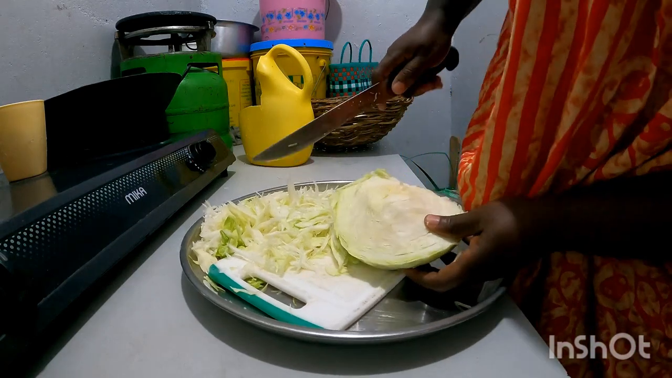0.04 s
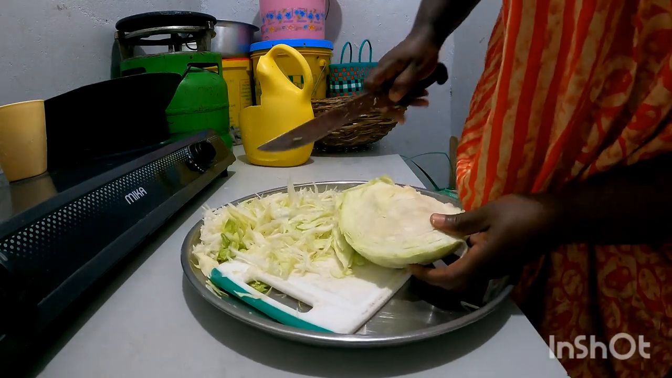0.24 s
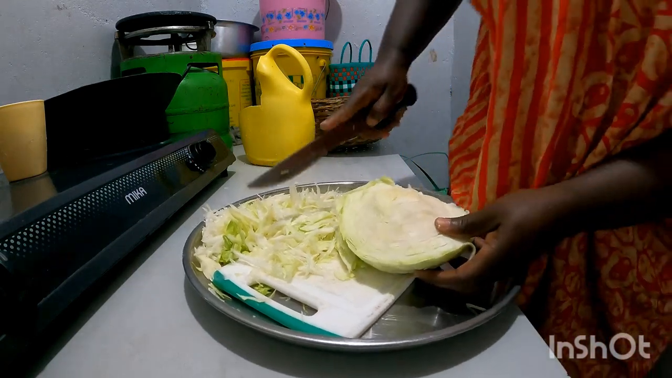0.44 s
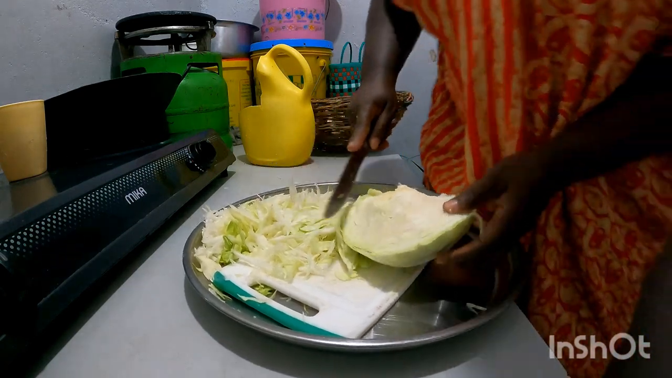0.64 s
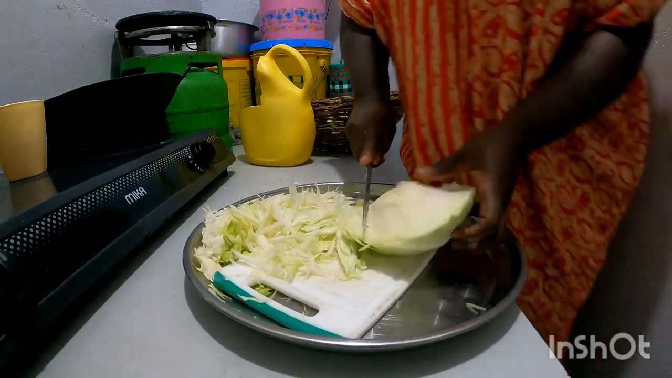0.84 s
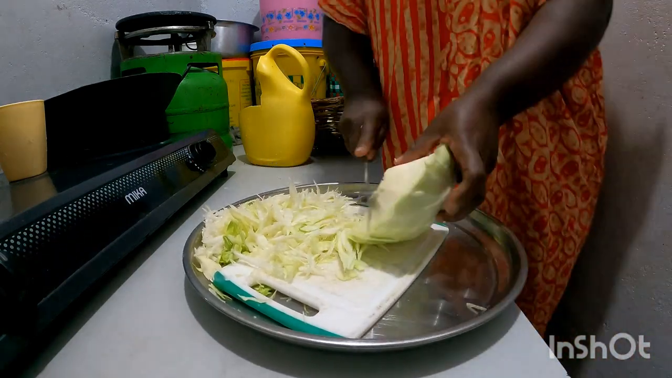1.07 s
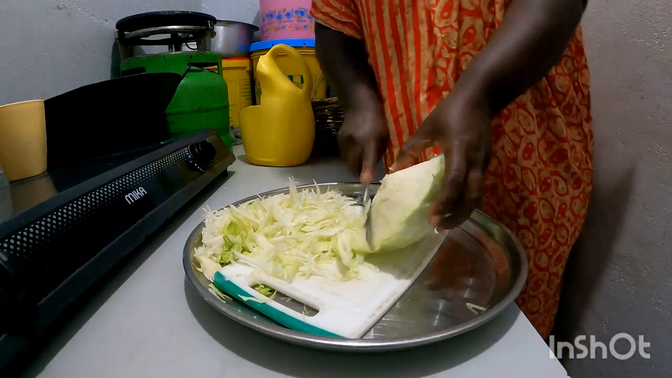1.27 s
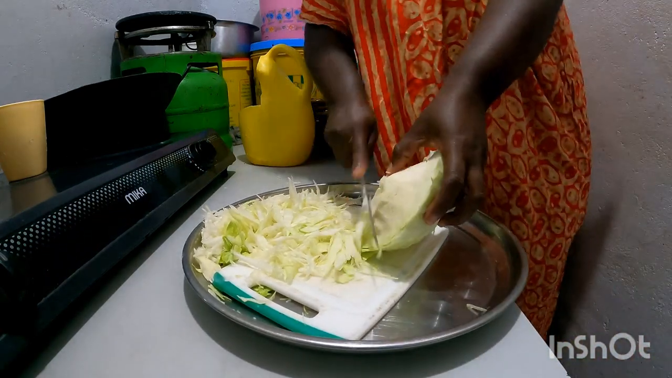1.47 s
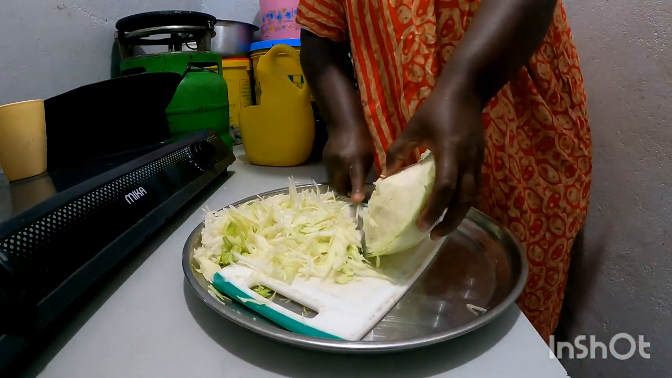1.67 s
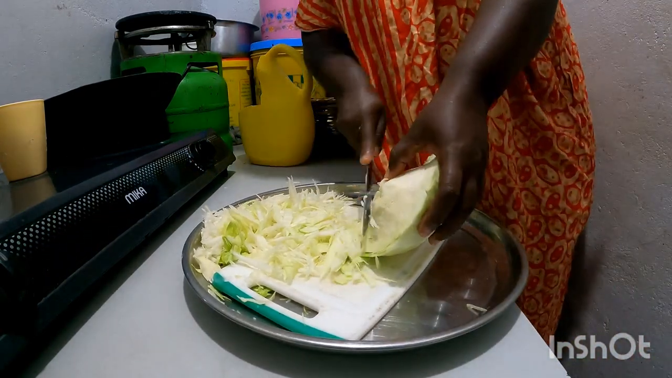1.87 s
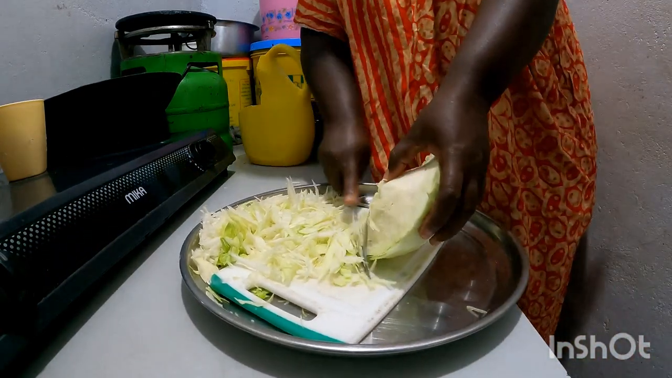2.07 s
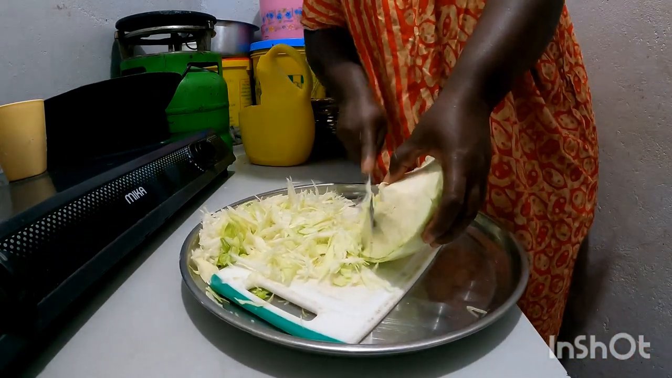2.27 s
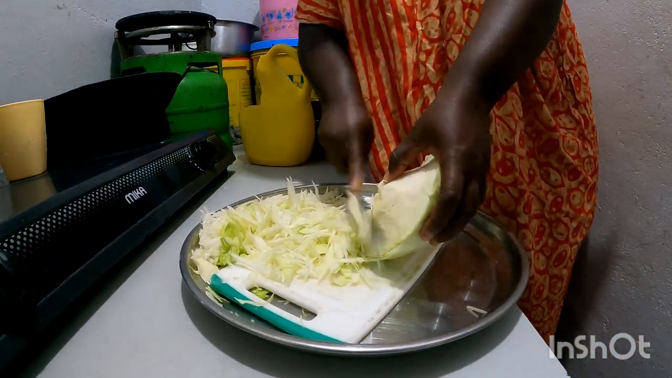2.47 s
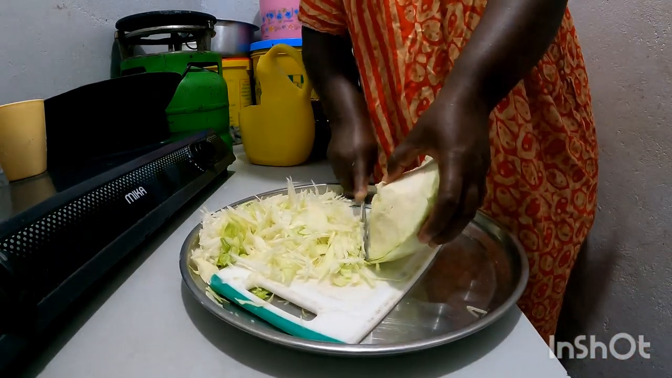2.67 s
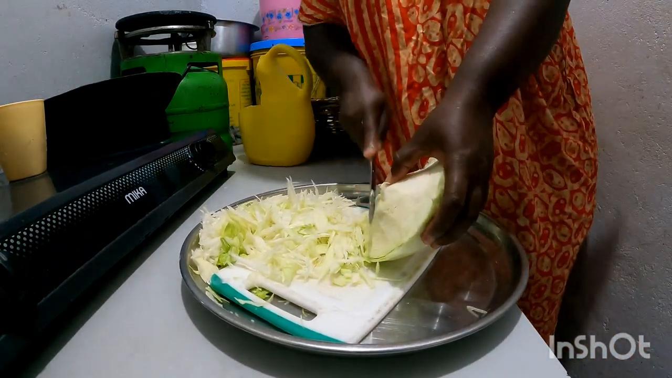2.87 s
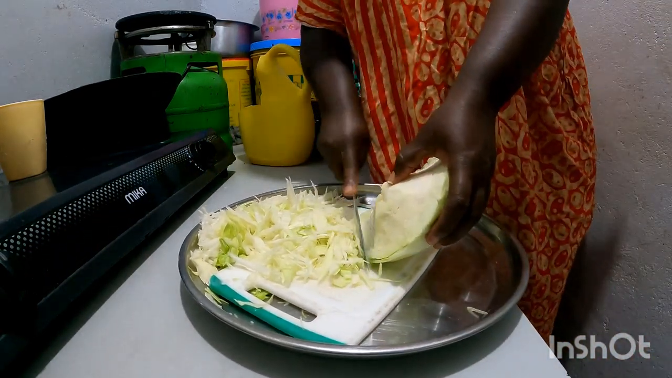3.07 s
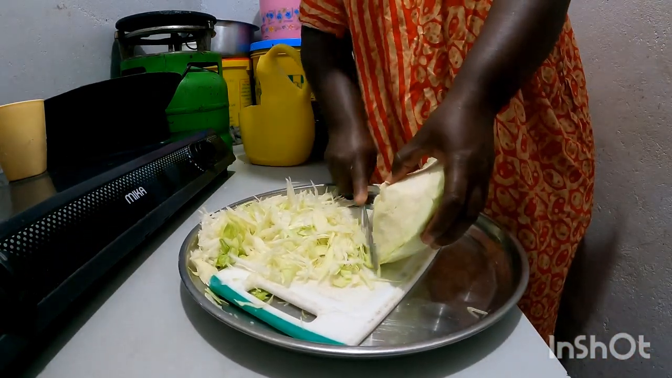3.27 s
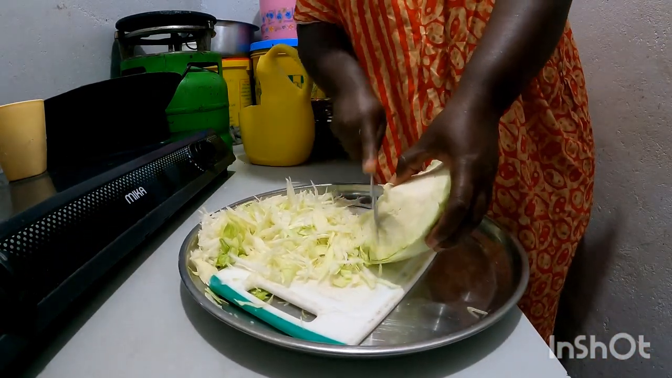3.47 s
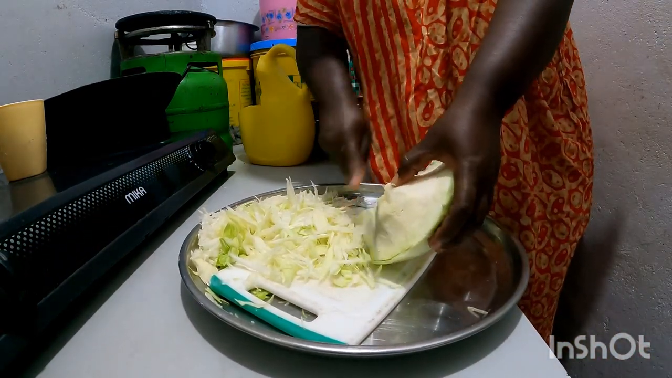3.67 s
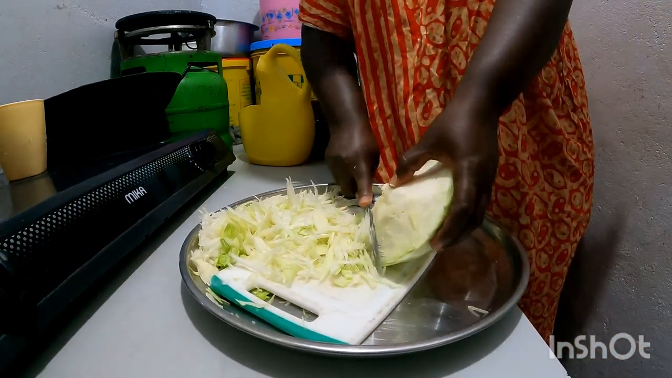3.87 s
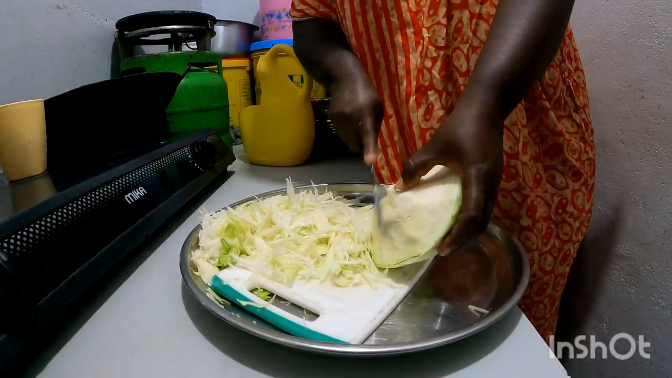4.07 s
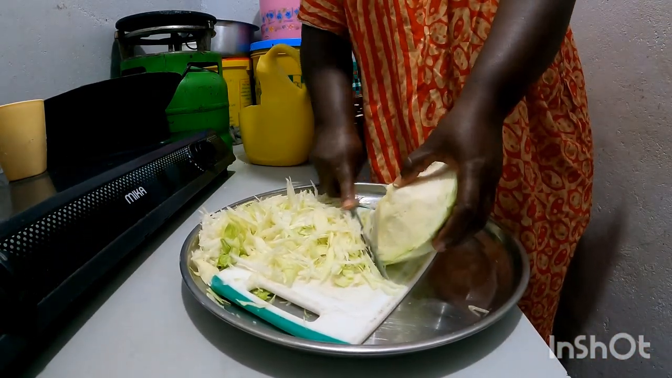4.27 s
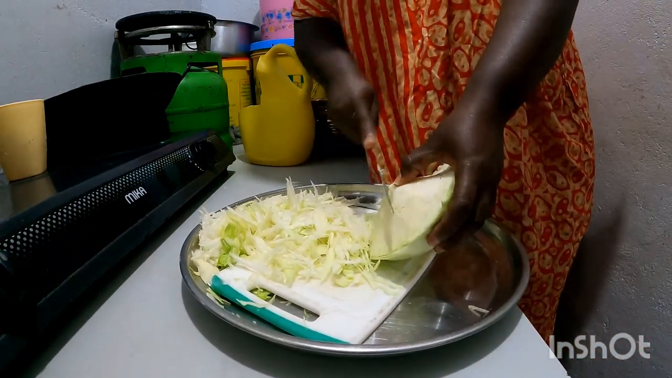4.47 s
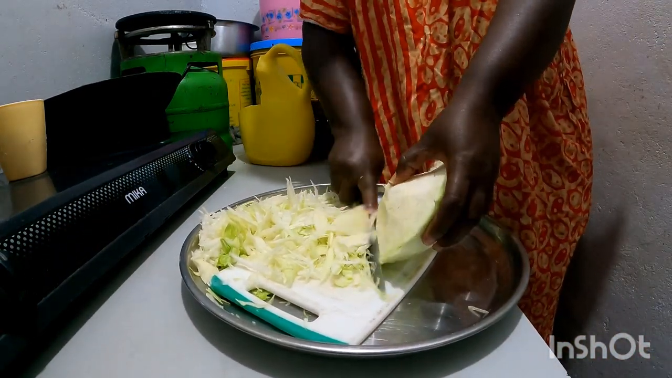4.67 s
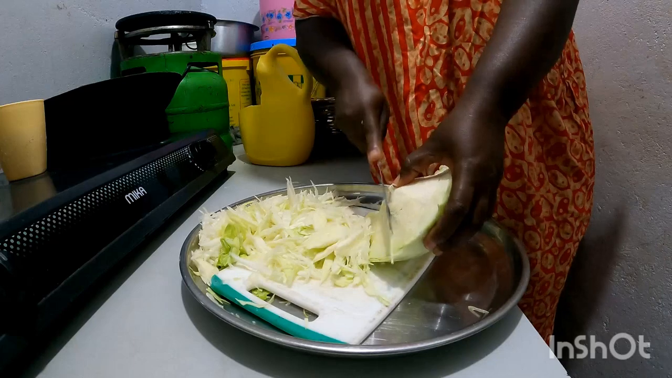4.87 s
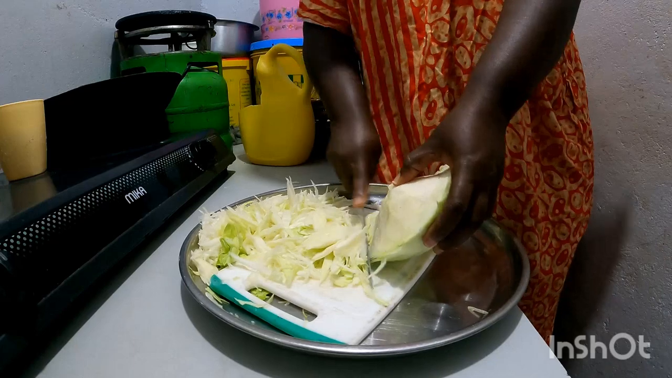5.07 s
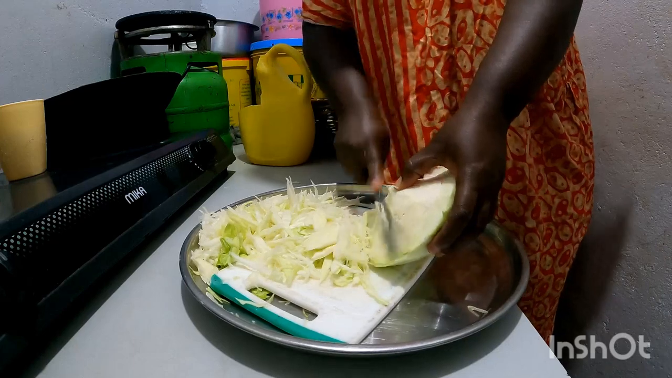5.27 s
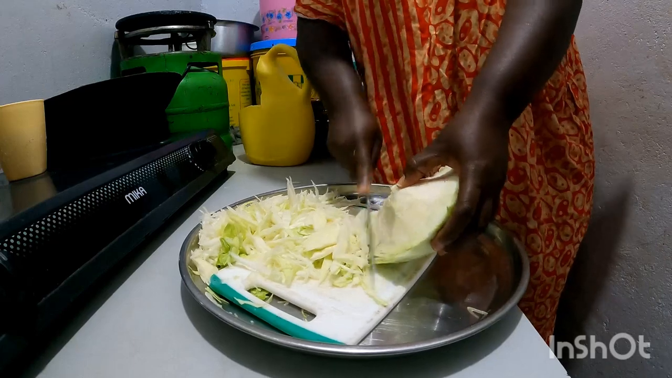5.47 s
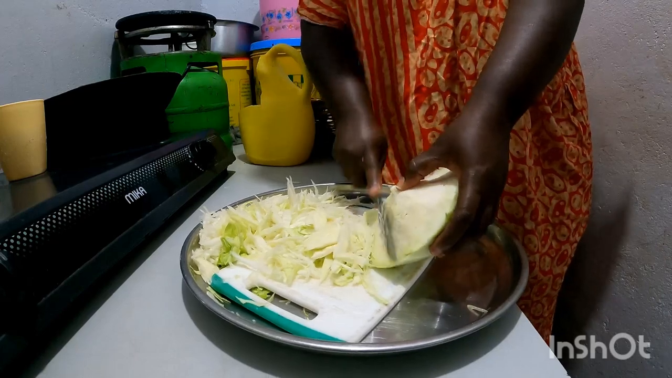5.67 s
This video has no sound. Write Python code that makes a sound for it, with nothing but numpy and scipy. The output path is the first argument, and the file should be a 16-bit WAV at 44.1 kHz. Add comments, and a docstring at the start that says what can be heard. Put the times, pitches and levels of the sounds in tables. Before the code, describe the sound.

A kitchen knife shreds cabbage close to the microphone. After a soft rub of leaves and a light scrape of the blade, about a dozen crunchy cuts follow in an even rhythm. The blade clacks on a plastic board, drawing a short ring from a steel tray. Loose shreds rustle and the counter gives an occasional dull bump, while a faint rumble lies under the small kitchen's echo.

```python
"""A kitchen knife shreds half a cabbage: each stroke tears through the leaves as a swelling crunch.
Most strokes end with the blade knocking a plastic board, which rings the steel tray it lies in.
Before the first cut the blade slides over the cabbage. Now and then a hand brushes the leaves,
shreds drop or the counter is bumped. The small, hard-walled kitchen echoes; a low rumble lies beneath."""
import sys
import numpy as np
from scipy import signal
from scipy.fft import rfft, irfft
from scipy.io import wavfile
from scipy.ndimage import uniform_filter1d

SR = 44100
rng = np.random.default_rng(int(sys.argv[2]) if len(sys.argv) > 2 else 0)


def put_to_file(sound):
    """Save the sound as 16-bit audio at rate SR, in the file named by the first command-line argument."""
    columns = np.atleast_2d(sound).T  # one column per channel
    safe = np.clip(columns, -1, 1)
    whole_steps = np.round(safe * 32767)
    wavfile.write(sys.argv[1], SR, whole_steps.astype(np.int16))


N = 253113


# The tone of a crisp leaf breaking: (frequency [Hz], level [dB])
LEAF_TONE = [(300,-14.5),(900,2),(2000,-19),(2800,3.5),(4800,2),(6500,-1.5),(8500,-7.5),(10500,-5),(13000,-18),(15000,-26),(16000,-33)]
# The tone of a knock on the plastic board: (frequency [Hz], level [dB])
KNOCK_TONE = [(100,-8.5),(250,-5),(350,-12.5),(520,-14.5),(800,-5.5),(1150,6),(1700,0),(2200,-1.5),(3000,-7),(6000,-59.5)]
def cutting(ribs_db=-5):
    """Bursting cells fizz and leaf ribs snap; gives the crunch and the force on the board."""
    cells = tiny_breaks(per_s=3500, spread_db=2.5, clump_db=1.5)
    ribs = tiny_breaks(per_s=360, spread_db=0.5, clump_db=4)
    breaks = unit(cells + amp(ribs_db) * ribs)
    crunch_gain, force_gain = strokes()
    crackle = grains(breaks * crunch_gain, LEAF_TONE, t60=0.0061)
    force = breaks * force_gain
    through_board = grains(force, KNOCK_TONE, t60=0.013)
    return amp(-0.5) * crackle + amp(-2) * through_board, force


# Knife strokes: (blade bites [s], deepest point [s], comes through [s], crunch level [dB],
# force level [dB], crunch swell from bite to deepest [dB], crunch fade time [s])
STROKES = [ (1.366, 1.44, 1.482, -21, -17.5, 19.5, 0.02), (1.695, 1.762, 1.777, -24, -18.5, 24.5, 0.036),
           (2.035, 2.108, 2.117, -22, -15, 19, .003), (2.377, 2.451, 2.503, -26.5, -21.5, 17, 0.0025),
           (2.708, 2.770, 2.765, -26, -21.5, 19, 0.034), (3.019, 3.069, 3.078, -21, -15, 26, 0.0052),
           (3.325, 3.395, 3.444, -27.5, -21.5, 10, 0.0035), (3.600, 3.647, 3.68, -29, -25.5, 17.5, 0.0019),
           (3.887, 3.961, 3.95, -27.5, -25, 18.5, 0.047), (4.212, 4.297, 4.306, -26, -19.5, 20, 0.004),
           (4.651, 4.756, 4.804, -27, -27.5, 23, 0.0065), (5.038, 5.102, 5.22, -34.5, -28.5, 17, 0.0032),
           (5.350, 5.426, 5.64, -37.5, -36.5, 13, 0.0043), ]
def strokes(force_lag_s=0.0054):
    """The deeper the blade, the more leaves tear at once; gives the gains of crunch and force."""
    crunch, force = np.zeros(N), np.zeros(N)
    for bite, deepest, end, crunch_db, force_db, swell_db, fade in STROKES:
        skin_db = 0.5 * hump(bite + 0.027, 0.0042)  # the taut outer leaf gives way first
        pinch_db = 3.5 * hump(end - 0.0047, 0.0067)  # the last leaves, pinched, burst together
        tear = swell(bite, deepest, end, swell_db, sag_db_per_s=53, fade_s=fade)
        press = swell(bite + force_lag_s, deepest, end, 1.11 * swell_db, sag_db_per_s=79, fade_s=fade / 2)
        crunch += amp(crunch_db + skin_db + pinch_db) * tear
        force += amp(force_db + skin_db) * press
    return crunch, force


def swell(start, top, end, swell_db, sag_db_per_s, fade_s, bite_s=0.016):
    """Gain of one pass of the blade: it bites, swells to the top, eases off and fades."""
    t = np.arange(N) / SR
    rise_db = -swell_db * np.clip((top - t) / max(top - start, 0.001), 0, 1)
    sag_db = sag_db_per_s * np.clip(t - top, 0, abs(end - top))
    bite = np.clip((t - start) / bite_s, 0, 1) ** 2
    return amp(rise_db - sag_db) * bite * np.exp(-np.maximum(t - end, 0) / fade_s)


def tiny_breaks(per_s, spread_db, clump_db):
    """Clicks of uneven size, bunched as one leaf after another gives way."""
    size = amp(spread_db * np.minimum(rng.exponential(1, N), 4)) * rng.choice([-1, 1], N)
    leaves = np.clip(unit(uniform_filter1d(rng.standard_normal(N), size=130)), -2, 2)
    happens = rng.random(N) < per_s / SR
    return unit(size * happens * amp(clump_db * leaves))


def grains(breaks, tone, t60, count=5):
    """Every break sounds from one of several spots, each with its own snap."""
    spot = rng.integers(0, count, N)
    return sum(through(breaks * (spot == k), snap(tone, t60)) for k in range(count))


# Sharp knocks and snaps during the cuts, mostly the blade landing on the board:
# (time [s], level [dB], extra treble [dB], extra bass [dB])
KNOCKS = [(1.409,-6,-17,-10),(1.441,-11.5,-15,6),(1.477,-15.5,-4,5.5),(1.757,-8,-12.5,-23),(1.8035,-4.5,-16.5,2.5),(2.1175,0,-10.5,3),(2.484,-1,-18,-25),(2.763,-20,-11,8.5),(2.783,-16.5,-7,13.5),(3.067,-11.5,-10,-4),(3.0762,-0.5,-4.5,4),(3.4462,-1,-18.5,-32),(3.6465,0,-5,4),(3.952,-13.5,-13.5,6),(3.974,-12,-28,4),(4.3044,-0.5,-8.5,-7),(4.7622,2,-4.5,2),(5.1116,0.5,-4,-10.5),(5.4327,1,-4,-3)]
# The tone of a sharp crack: (frequency [Hz], level [dB])
CRACK_TONE = [(800,-36),(1700,5),(2700,-8),(3800,1),(5200,1),(6500,-10),(8500,-22.5),(11000,-27.5),(15000,-32)]
# The notes of the blade's ping: (frequency [Hz], level [dB], ring time [s])
BLADE_NOTES = [(3788,3,0.04),(3900,-22,.07),(4850,-1,0.037),(5050,-13,0.091),(5500,0.5,0.083),(5550,0,0.055),(6600,-20,0.04)]
def knocks():
    """Knock, crack and ping, mostly from the blade landing; gives sound, a blow to the tray, a push."""
    sound, blow, push = np.zeros((2, N)), np.zeros(N), np.zeros(N)
    ping = ring(BLADE_NOTES)
    for s, db, treble_db, bass_db in KNOCKS:
        add(sound, s, amp(db + 13) * snap(KNOCK_TONE, t60=0.025))
        add(sound, s, amp(db + treble_db + 19) * snap(CRACK_TONE, t60=0.027))
        add(sound, s, amp(db + treble_db - 20.5) * ping)
        add(blow, s, amp([db]))
        add(push, s, amp([db + bass_db]))
    return sound, blow, push


# The notes of the steel tray: (frequency [Hz], level [dB], ring time [s])
TRAY_NOTES = [(1040,-11,0.9),(1110,13.5,1),(1080,15,0.41),(1186,34.5,0.31),(1340,-9,0.31),(1510,35,0.43),(1550,-1,0.26),(1620,-15,0.37),(1530,-45,.4),(1640,-22,0.12),(1728,25,0.51),(1710,12,0.32),(1744,31.5,0.3),(2050,-6,0.56),(2304,-45,0.27),(2540,-4,0.32)]
def tray(force, blow, lean_db=5.1):
    """The tray rings under the blade; each note has a random sign and leans left or right."""
    steel = np.zeros((2, SR))
    for note in TRAY_NOTES:
        sign, side = rng.uniform(-1, 1, 2)
        steel += np.sign(sign) * amp(lean_db * side * np.array([[1], [-1]])) * ring([note])
    return through(amp(-14) * force + amp(8) * blow, steel / np.linalg.norm(steel[0]))


# The tone of the steel's shimmer: (frequency [Hz], level [dB])
SHIMMER_TONE = [(150,-21),(270,-1),(380,-20),(600,-25),(850,-1),(1150,7.5),(1800,3.5),(2500,-2),(3500,-2),(5200,-2),(6500,-10.5),(8500,-23),(14000,-56)]
# How long it lasts: (frequency [Hz], ring time [s])
SHIMMER_TIMES = [(250,0.51),(1200,0.72),(2500,0.66),(5000,0.61),(9000,0.5)]
def shimmer():
    """A sharp knock also wakes the steel's many closely packed notes."""
    hits = np.zeros(N)
    for s, db, treble_db, _ in KNOCKS:
        add(hits, s, amp([db + treble_db]))
    return amp(13.5) * through(hits, wash(SHIMMER_TONE, SHIMMER_TIMES, rise_s=0.0028))


# The low notes of the board on the tray: (frequency [Hz], level [dB], ring time [s])
BOARD_NOTES = [(49.6,3.5,0.35),(69.4,2.5,0.44),(101.7,-7,0.27),(145,1,0.35),(207.8,-5,0.17),(243.2,-2.5,0.16),(281,-8.5,0.24),(321,-20,0.37)]
def board(force, push):
    """Cuts and knocks make the board thud on the tray."""
    return struck(amp(-7.5) * force + amp(12) * push, BOARD_NOTES)


# The tone of leaves being rubbed: (frequency [Hz], level [dB])
RUB_TONE = [(100,-12),(280,1),(480,-1),(730,2),(900,3.5),(1100,4),(1900,6.5),(2600,6.5),(3400,-9),(4500,-3),(7000,-12),(12000,-76)]
# The notes of the blade pressed on the cabbage: (frequency [Hz], level [dB], ring time [s])
PRESSED_NOTES = [(378.4,-13,0.089),(718,-3,0.27),(1054,-5.5,0.1),(1450,-12,0.084),(1875,-6,0.18),(2530,-2,0.16)]
def sliding():
    """Steel and skin stick and slip on the leaves; on its one long slide the blade sings faintly."""
    slips = tiny_breaks(per_s=7000, spread_db=2, clump_db=0.5)
    hand = brushes()
    # the blade speeds up, slows down and stops as the first cut begins
    blade = amp(-33) * swell(0.66, 0.92, 1.37, swell_db=10.5, sag_db_per_s=16.5, fade_s=0.013)
    rasp_gain = amp(-31) * hand + amp(-16.5) * blade + amp(-34) * hump(1.036, 0.081)
    rub = grains(slips * (hand + blade), RUB_TONE, t60=0.023, count=3)
    rasp = grains(slips * rasp_gain, LEAF_TONE, t60=0.0032, count=3)
    song = struck(slips * blade, PRESSED_NOTES)
    return amp(-4.5) * rub + amp(-11) * song + amp(-3) * rasp


# The hand brushes the cabbage: (time [s], level [dB], fade time [s])
BRUSHES = [(0.065, -25.5, 0.33), (.455, -46, 0.31), (0.609, -48, 0.16), (5.615, -32, .15)]
def brushes(rise_s=0.0043):
    """Gain of the brief touches: each starts quickly, then dies away."""
    gain, t = np.zeros(N), np.arange(SR) / SR
    for s, db, t60 in BRUSHES:
        add(gain, s, amp(db - 60 * t / t60) * (1 - np.exp(-t / rise_s)))
    return gain


# Loose shreds drop: (time [s], level [dB])
SHREDS = [(0.074,-40),(.615,-39),(1.619,-30.5),(1.932,-40),(2.942,-42.5),(3.816,-36),(4.571,-31.5),(4.631,-41),(5.614,-26.5)]
def shreds(t60=0.12, rise_s=0.008):
    """Falling strips of cabbage snap and rustle softly."""
    gain, t = np.zeros(N), np.arange(SR // 4) / SR
    fall = amp(-60 * t / t60) * (1 - np.exp(-t / rise_s))
    for s, db in SHREDS:
        add(gain, s, amp(db) * fall)
    breaks = gain * tiny_breaks(per_s=2500, spread_db=4, clump_db=2)
    crackle = through(breaks, snap(LEAF_TONE, t60=0.0032))
    rustle = through(breaks, snap(RUB_TONE, t60=0.05))
    return amp(-7) * crackle + amp(-12) * rustle


# The counter is bumped or the cabbage shifts: (time [s], sway level [dB], rattle level [dB])
BUMPS = [(.25,-42,-54),(.465,-38,-44),(0.609,-40,-44),(.688,-30.5,-38.5),(0.751,-43,-37.5),(1.168,-31,-68),(2.219,-3.5,-13.5),(3.562,-15,-37.5),(4.7,-23,-45.5),(5.621,-41.5,-51.5)]
# The low notes of the swaying counter: (frequency [Hz], level [dB], ring time [s])
COUNTER_NOTES = [(33.6,1,0.55),(71.05,-9,0.95),(148.2,-8.5,0.34),(279.7,-13.5,0.23),(380,-13,0.17),(547,-27,0.81)]
# The tone of things rattling on it: (frequency [Hz], level [dB])
RATTLE_TONE = [(88, -25), (150, -5), (187, -18), (278, -7.5), (319, -7), (449, -15), (701, -9.5),
               (876, -17), (938, -8.5), (1230, -10.5), (9000, -58), (11700, -61), (19800, -120)]
def counter(force, rise_s=0.012, rattle_t60=0.48):
    """The counter sways under cuts and bumps; bumps also rattle the things on it."""
    bumps, t = np.zeros((2, N)), np.arange(SR) / SR
    for s, sway_db, rattle_db in BUMPS:
        sway = amp(sway_db) * ring(COUNTER_NOTES)
        rattle = noise(RATTLE_TONE, SR) * amp(rattle_db + 6 - 60 * t / rattle_t60)
        add(bumps, s, (sway + rattle) * (1 - np.exp(-t / rise_s)))
    return bumps + struck(amp(-9.5) * force, COUNTER_NOTES)


# Echoes from near surfaces: (delay [s], level [dB])
ECHOES = [(.0024,-11),(.0077,-4),(0.012,-14),(0.023,-14),(0.0225,-10),(0.029,-12)]
# The tone of the room's lingering sound: (frequency [Hz], level [dB])
ROOM_TONE = [(60,-29),(230,2),(550,-5),(1150,4.5),(1800,0),(2500,-5),(5000,-10),(7500,-7),(10000,-17.5),(15000,-7)]
# How long it lingers: (frequency [Hz], fade time [s])
ROOM_TIMES = [(125,0.3),(500,0.61),(1200,0.35),(2500,0.41),(5000,0.29),(8000,0.33),(14000,0.31)]
def kitchen(x, tail_db=-7, dull_hz=2800):
    """Near surfaces throw back dulled echoes; the walls add a fading tail."""
    echoes = np.zeros((2, SR))
    for s, db in ECHOES:
        for side in echoes:
            delay = abs(s + 0.00005 * rng.standard_normal())
            side[round(delay * SR)] += amp(db)
    echoes = signal.lfilter(*signal.butter(2, dull_hz, fs=SR), echoes)
    tail = amp(tail_db) * wash(ROOM_TONE, ROOM_TIMES, rise_s=0.00095)
    return x + through(x, echoes + tail)


# The tone of the low rumble: (frequency [Hz], level [dB])
RUMBLE_TONE = [(12, -19), (20, -3.5), (32, 8), (92, -6), (145, -2), (200, -10), (284, -12.5), (362, -23.5),
               (461, -18.5), (500, -43.5), (650, -54), (1100, -120)]
# The tone of the faint hiss: (frequency [Hz], level [dB])
HISS_TONE = [(200,-8),(600,-6.5),(1500,-5),(3000,-13),(7000,-15),(9000,-23.5),(13000,-25.5),(16000,-65)]
def background():
    """A low rumble and a faint hiss, both slowly fading."""
    t = np.arange(N) / SR
    rumble = amp(-36.5 - 2.5 * t) * noise(RUMBLE_TONE, N)
    hiss = amp(-52 - t) * noise(HISS_TONE, N)
    return rumble + hiss


# How alike left and right sound: (frequency [Hz], likeness [0-1])
LIKENESS = [(100,1),(300,0.82),(700,0.59),(1500,0.67),(4000,0.43),(15000,1)]
def noise(tone, size, spread=0.91):
    """Stereo noise of the given tone; left and right differ most in the middle and treble."""
    hz = np.fft.rfftfreq(size, 1 / SR)
    left, other = rfft(rng.standard_normal((2, size)))
    same = np.clip(1 - spread * (1 - read(LIKENESS, hz)), 0, 1)
    right = same * left + np.sqrt(1 - same ** 2) * other
    return unit(irfft(np.array([left, right]) * amp(read(tone, hz)), size))


def snap(tone, t60, size=4096):
    """A short burst of the given tone, made from noise that falls 60 dB in t60 seconds."""
    hz, t = np.fft.rfftfreq(size, 1 / SR), np.arange(size) / SR
    burst = rfft(noise([(1, 0), (SR, 0)], size, spread=0.38) * amp(-60 * t / t60))
    power = uniform_filter1d(abs(burst) ** 2, size=9, axis=1)
    # this filter evens out the burst and gives it the tone, keeping its start sharp (minimum phase)
    log_gain = np.log(amp(read(tone, hz)) / np.sqrt(power + 1e-12))
    mirrored = np.c_[log_gain, log_gain[:, -2:0:-1]]
    shaping = np.exp(np.conj(signal.hilbert(mirrored)))[:, :len(hz)]
    response = irfft(burst * shaping)[:, :size // 2]
    return response / np.linalg.norm(response[0])


def wash(tone, fade_times, rise_s):
    """A smooth tail of noise that builds up, then dies band by band."""
    t, hz = np.arange(SR) / SR, np.fft.rfftfreq(SR, 1 / SR)
    spectrum = rfft(noise(tone, SR))
    centres, t60s = np.transpose(fade_times)
    bands = [irfft(spectrum * read(np.c_[centres, pick], hz), SR) for pick in np.eye(len(t60s))]
    tail = sum(band * amp(-60 * t / t60) for band, t60 in zip(bands, t60s))
    tail *= 1 - np.exp(-(t / rise_s) ** 2)
    return tail / np.linalg.norm(tail[0])


def ring(notes):
    """The notes of a struck object: sine waves that each fall 60 dB in their ring time."""
    t = np.arange(SR) / SR
    return sum(amp(db - 60 * t / t60) * np.sin(2 * np.pi * hz * t) for hz, db, t60 in notes)


def struck(x, notes):
    """The force x shakes an object that rings at these notes."""
    body = ring(notes)
    return through(x, body / np.linalg.norm(body))


def through(x, response):
    """Every sample of x sets off a copy of the response."""
    return signal.oaconvolve(np.atleast_2d(x), np.atleast_2d(response), axes=1)[:, :N]


def hump(at_s, width_s):
    """A smooth bell shape of height 1."""
    return np.exp(-((np.arange(N) / SR - at_s) / width_s) ** 2)


def add(mix, s, sound):
    """Adds a sound into the mix at s seconds."""
    part = mix[..., round(s * SR):][..., :sound.shape[-1]]
    part += sound[..., :part.shape[-1]]


def read(points, hz):
    """Reads between a table's rows, with frequency spaced by octaves."""
    f, value = np.transpose(points)
    return np.interp(np.log(hz + 1), np.log(f + 1), value)


def amp(db):
    """Turns decibels into a gain to multiply by."""
    return 10 ** (np.asarray(db) / 20)


def unit(x):
    """Scales x to an average power of 1."""
    return x / np.sqrt(np.mean(x ** 2) + 1e-20)


# A band counts as quiet below this level: (frequency [Hz], level [dB])
QUIET_LEVELS = [(100,-100),(350,-77),(700,-76),(1300,-73),(3000,-78),(6000,-82),(10000,-95),(15000,-112)]
def hush(x, depth_db=-8):
    """Noise suppression: bands that fall quiet are turned further down."""
    hz, _, bands = signal.stft(x, SR, nperseg=512)
    power = (abs(bands) ** 2).mean(0)
    power = uniform_filter1d(uniform_filter1d(power, size=9, axis=0), size=5, axis=1)
    above_quiet = (power / amp(read(QUIET_LEVELS, hz))[:, None] ** 2) ** 2
    return signal.istft(bands * amp(depth_db / (1 + above_quiet)), SR, nperseg=512)[1][:, :N]


def scene():
    """All the work at the board, in the kitchen; the left side is louder and one sample late."""
    crunch, force = cutting()
    knocking, blow, push = knocks()
    knife_work = kitchen(crunch + knocking + sliding() + shreds())
    ringing = tray(force, blow) + shimmer() + board(force, push)
    left, right = knife_work + ringing + counter(force) + background()
    return np.array([amp(1) * np.r_[0, left[:-1]], amp(-1) * right])


def record(dry):
    """Deepens the quiet gaps, clips the hardest knocks and cuts the highest treble."""
    clipped = np.clip(hush(dry), -1, 1)
    treble_cut = signal.firwin(255, 15800, fs=SR)
    return signal.oaconvolve(clipped, treble_cut[None], "same", axes=1)


dry = scene()
out = record(dry)
put_to_file(out)
```